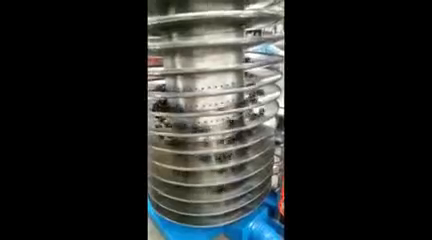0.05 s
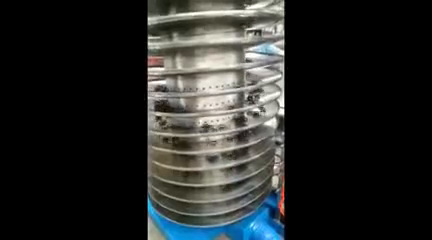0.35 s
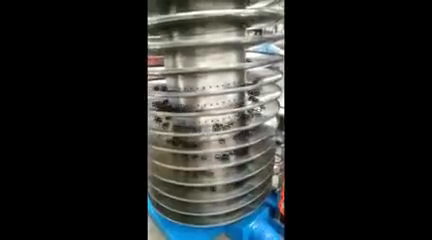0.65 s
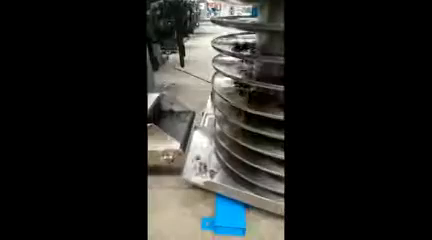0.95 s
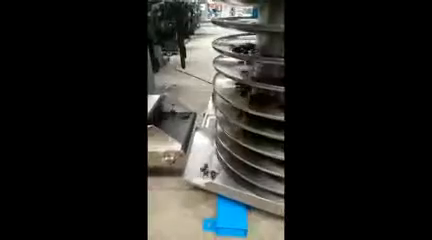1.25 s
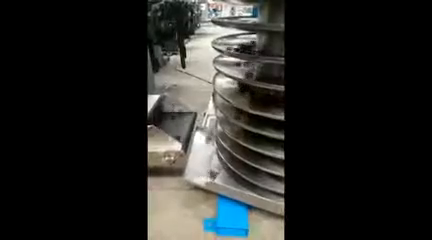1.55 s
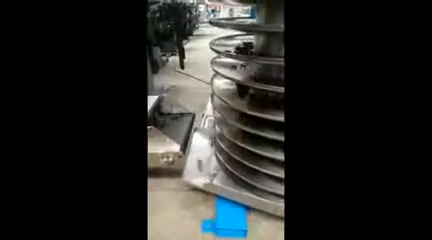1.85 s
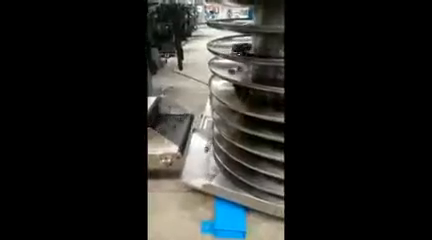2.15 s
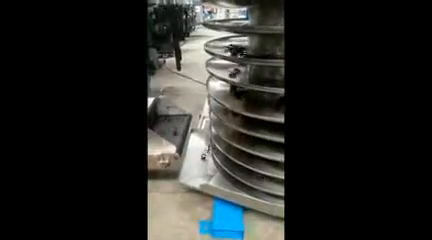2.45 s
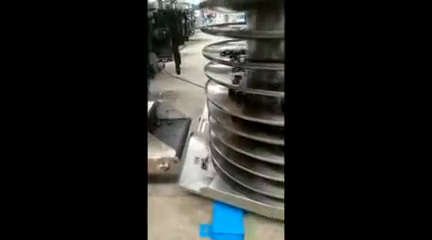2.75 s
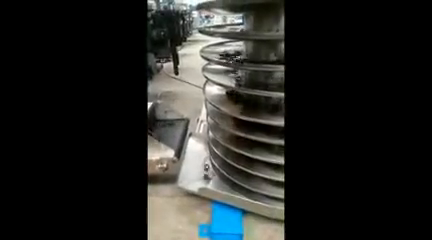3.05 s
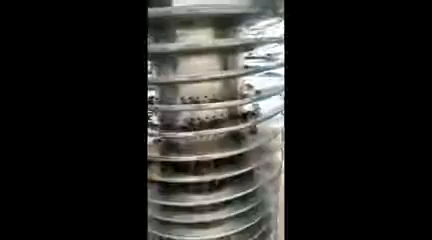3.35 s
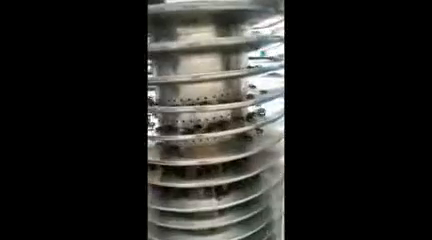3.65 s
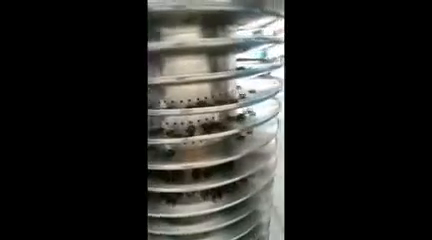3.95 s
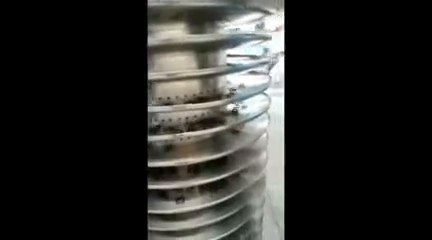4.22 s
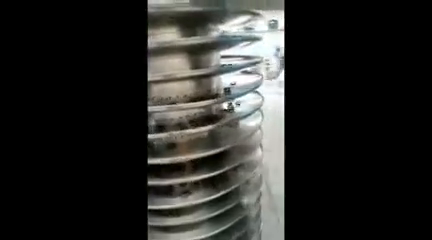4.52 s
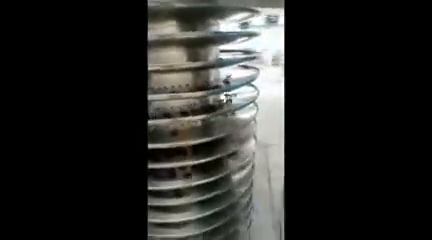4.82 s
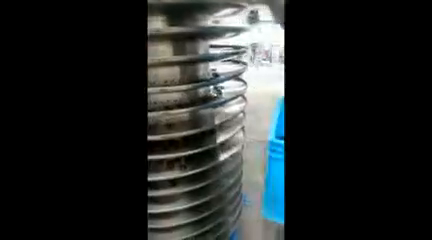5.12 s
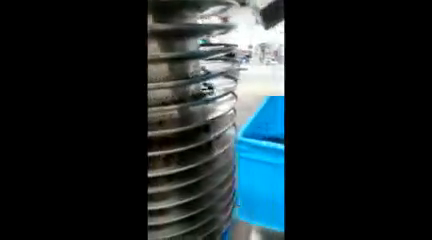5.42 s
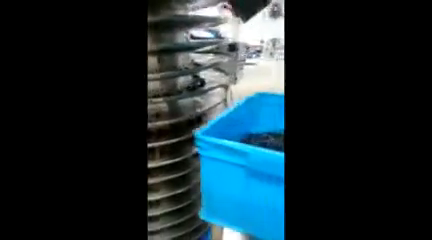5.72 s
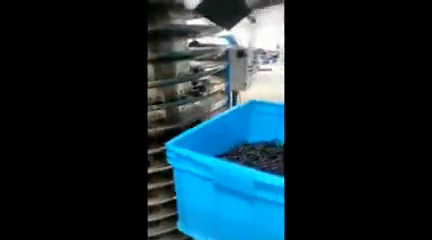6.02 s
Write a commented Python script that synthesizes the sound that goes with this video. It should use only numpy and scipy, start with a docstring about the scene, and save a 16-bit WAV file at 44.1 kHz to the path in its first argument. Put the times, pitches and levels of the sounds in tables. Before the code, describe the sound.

Close to a vibrating conveyor in a workshop, bright metallic clashes and chinks repeat in a fast, strict rhythm while small rubber parts patter on ringing steel. The noise breaks off briefly after one second, then resumes with a heavier pulsing hum and knocking from the base. About halfway through, the balance changes as if heard from another side, and a thin metallic ring grows toward the end.

```python
"""Vibrating spiral conveyor

A steel spiral shakes small rubber parts up its track in a workshop, heard close by from three
positions, with a short silence after the first. Random impacts make the sheet metal boom and ring,
and the parts patter over the hum of the drive. Five or six times a second, strictly in step,
the shaking swells: a loose steel edge clashes, then the base knocks and rebounds."""
import sys
import numpy as np
from scipy import signal
from scipy.fft import rfft, irfft
from scipy.io import wavfile
from scipy.ndimage import uniform_filter1d

SR = 44100
rng = np.random.default_rng(int(sys.argv[2]) if len(sys.argv) > 2 else 0)


def transcribe(u):
    """Save the signal u as a 16-bit wav file named by the first command-line argument.

    u: samples, shape (n,) or (channels, n), limited to [-1, 1]; the rate is SR.
    q: integer samples, one column per channel.
    """
    v = np.clip(np.atleast_2d(u).T, -1, 1)
    q = np.round(v * 32767).astype(np.int16)
    wavfile.write(sys.argv[1], SR, q)


N = 272538
TIME = np.arange(N) / SR
CYCLE_S = .1832  # period of the shaking

# Listening positions. Each row: start, end, time of one clash, time of one hum swell, all in seconds.
POSITIONS = [(0, .986, .165, .22), (1.689, 3.4, 1.7487, 1.808), (3.4, 6.2, 3.5177, 3.606)]
# Transmission to each position. Each row: gains in dB of boom, patter, clash, knock, chink, hum,
# the hum's octave and shudder.
PATH_GAINS = [(-18.5, -16, -1, -27, -16, -53.5, -32.5, -29.5),
              (-15.3, -19.3, -.3, -18.3, -16, -39.3, -40, -32),
              (-15, -19.8, .7, -20, -16.5, -36.5, -48, -31.3)]


def gain_of(db):
    """Decibels express an amplitude ratio on a logarithmic scale."""
    return 10 ** (np.asarray(db) / 20)


def unit_rms(x):
    """Normalisation to a mean power of 1."""
    return x / np.sqrt(np.mean(x ** 2) + 1e-20)


def add(mix, s, sound):
    """Superposition: a sound joins the mix at s seconds."""
    start = round(s * SR)
    sound = sound[max(-start, 0):]
    part = mix[max(start, 0):][:len(sound)]
    part += sound[:len(part)]


def colour(x, spectrum, size=4096):
    """A body filters x: convolution with a minimum-phase impulse response of unit energy."""
    hz, db = np.transpose(spectrum)
    log_hz = np.log(abs(np.fft.fftfreq(size, 1 / SR)) + 1)
    log_gain = np.log(gain_of(np.interp(log_hz, np.log(hz), db)))
    response = np.exp(np.conj(signal.hilbert(log_gain)))
    body = np.fft.ifft(response).real[:size // 2]
    return signal.oaconvolve(x, body / np.linalg.norm(body))[:len(x)]


def drift(rate_hz):
    """Low-passed noise gives a slow random fluctuation of rms 1."""
    hz = np.fft.rfftfreq(N, 1 / SR)
    return unit_rms(irfft(rfft(rng.standard_normal(N)) * np.exp(-(hz / rate_hz) ** 2), N))


def swell(s, half_s):
    """A Gaussian envelope: 1 at time s, 1/e at half_s to either side."""
    return np.exp(-((TIME - s) / half_s) ** 2)


def impacts(per_s, spread_db, size=N):
    """Shot noise: tiny blows of uneven strength at random moments; rms 1."""
    strength = gain_of(spread_db * np.clip(rng.standard_normal(size), -2, 2))
    polarity = rng.choice([-1, 1], size)
    return unit_rms(strength * polarity * (rng.random(size) < per_s / SR))


def chatter(rise_s, hold_s, t60_s, per_s, size=6000):
    """Steel rattles on steel: dense contacts build up, hold and decay exponentially."""
    t = np.arange(size) / SR
    decay = gain_of(-60 * np.maximum(t - hold_s, 0) / t60_s)
    return impacts(per_s, spread_db=.99, size=size) * np.minimum(t / rise_s, 1) * decay


def ring(blows, hz, width_hz):
    """Resonance: one mode of the steel responds to the blows in a narrow band; rms 1."""
    return unit_rms(signal.lfilter(*signal.iirpeak(hz, hz / width_hz, SR), blows))


def shaking_gain():
    """Forced vibration: sheet and parts both follow the strength of the shaking."""
    # Strength of the shaking. Each row: time in seconds, level in dB.
    strength = [(0, -1.4), (.9, -1.2), (1.95, 0), (2.3, -2), (2.85, -1.96), (3.25, -0.5), (4.35, 0.05),
                (5.2, -0.56), (6.2, -0.4)]
    return gain_of(np.interp(TIME, *np.transpose(strength)))


def sheet_metal():
    """Impact excitation: the wide steel flights boom and their modes ring; one signal a position."""
    # Broad response of the sheet. Each row: frequency in Hz, level in dB.
    boom_spectrum = [(20, -44.5), (55, -41), (90, -12), (150, -11.5), (220, -5.5), (350, -2), (490, -2.5),
                     (640, -1.5), (800, -2.5), (930, -3.5), (1100, -8), (1600, -16.5), (3000, -22),
                     (8000, -65.5)]
    # Modes of the spiral. Each row: frequency and bandwidth in Hz, level in dB at each position.
    modes = [(245, 10, -50, -33.5, -41), (306.3, 14, -47, -32.5, -39), (352.5, 19, -37.5, -39.5, -33),
             (424, 21, -38, -55, -29.5), (476, 12, -38.5, -54, -49), (530, 21, -49, -30.5, -48),
             (613.5, 7.9, -42, -33, -34), (624, 8, -41, -30, -29.5), (637.4, 6.4, -43.5, -47, -34.5),
             (720, 9, -38, -30.5, -31.5), (825, 9.9, -43.5, -36.5, -36), (907.5, 13, -35, -31, -35),
             (940, 17, -42, -29.5, -35), (1248, 14, -49.5, -39, -48), (1360, 27.5, -39, -42, -35.5),
             (1442, 17, -46, -39, -40), (1756, 9, -42.5, -36, -46), (1868, 17, -45.5, -33.5, -38),
             (1973, 30, -49, -47, -42), (2201, 8.4, -39.5, -32, -38), (2484, 13, -38, -46, -39.5),
             (4150, 42, -44, -55, -48), (4257, 24, -37, -51, -46), (4410, 24, -41, -44, -50),
             (4400, 26, -44.5, -44, -46), (4630, 76, -46, -60, -60)]
    blows = impacts(per_s=4000, spread_db=2.1)
    boom = colour(impacts(per_s=4000, spread_db=2.74), boom_spectrum)
    rings = np.array([ring(blows, hz, width) for hz, width, *_ in modes])
    ringing = gain_of(np.array(modes)[:, 2:].T) @ rings
    boom_gains = gain_of(np.array(PATH_GAINS)[:, :1])
    return shaking_gain() * (boom_gains * boom + ringing)


def rubber_parts():
    """Modulated shot noise: hundreds of small parts hop on the track and land in loose clumps."""
    # Patter from the front (first position) and the side. Each row: frequency in Hz, level in dB.
    front_spectrum = [(150, -32), (700, -10), (1300, -2), (1600, -2.5), (2400, 0.5), (3000, -2), (3700, -1),
                      (4300, 3.5), (4600, -2), (5000, -7.5), (6000, -16), (8500, -24), (10500, -28),
                      (14500, -63)]
    side_spectrum = [(150, -36), (700, -18.5), (1400, -2), (1700, -3.5), (2350, -2), (3000, -2.5),
                     (3700, -0.5), (4350, 3), (4600, -1), (5000, -6.5), (6000, -14.5), (8500, -29),
                     (10500, -36), (14500, -80)]
    hops = impacts(per_s=8000, spread_db=1.5) * gain_of(.48 * drift(70))
    front = gain_of(3) * colour(hops, front_spectrum)
    side = gain_of(1.8) * colour(hops, side_spectrum)
    return shaking_gain() * np.where(TIME < POSITIONS[1][0], front, side)


def drive(hum_db, octave_db, swell_s):
    """Harmonic vibration: the drive's fundamental swells once a cycle under a less steady octave."""
    # The swells that boom hardest. Each row: time in seconds, extra level in dB.
    hard_swells = [(1.808, 7), (2.724, 5), (3.975, 9), (4.705, 4), (5.072, 6), (5.438, 4)]
    hum_hz, swell_db, half_s = 96.3, 5, .017
    turns = hum_hz * TIME + .09 * drift(10)
    octave_turns = 2 * turns + .12 * drift(25)
    from_swell_s = (TIME - swell_s + CYCLE_S / 2) % CYCLE_S - CYCLE_S / 2
    surge_db = swell_db * np.exp(-(from_swell_s / half_s) ** 2)
    surge_db += sum(db * swell(s, 2 * half_s) for s, db in hard_swells)
    hum = gain_of(hum_db + surge_db) * np.sin(2 * np.pi * turns)
    octave = gain_of(octave_db + 2.5 * drift(8)) * np.sin(2 * np.pi * octave_turns)
    return np.sqrt(2) * (hum + octave)


def waver(hz, wobble_turns, flutter_db, rate_hz):
    """Random phase and amplitude modulation make a sustained ring waver."""
    turns = hz * TIME + wobble_turns * drift(rate_hz)
    return np.sqrt(2) * np.sin(2 * np.pi * turns) * gain_of(flutter_db * drift(rate_hz))


def singing_spiral():
    """Directional radiation: two modes of the spiral are loud only from certain places."""
    # The high mode, sung by one flight. Each row: time in seconds, level in dB.
    high_levels = [(0, -41), (3.4, -42), (3.6, -37), (3.8, -43), (4.0, -33), (4.15, -44), (4.6, -36),
                   (5.3, -34.5), (5.7, -29.7), (5.95, -33), (6.15, -28)]
    # Brief rises of the low mode. Each row: time and half width in seconds, level in dB.
    low_swells = [(3.48, .06, -23), (5.9, .11, -19.5)]
    high = waver(hz=2447, wobble_turns=.09, flutter_db=2.2, rate_hz=25)
    low = waver(hz=744, wobble_turns=.14, flutter_db=2, rate_hz=35)
    high_gain = gain_of(np.interp(TIME, *np.transpose(high_levels)))
    low_gain = sum(gain_of(db) * swell(s, half_s) for s, half_s, db in low_swells)
    return high_gain * high + low_gain * low


def workshop():
    """Ambient noise: a steady broadband background, weak in the treble."""
    # Background of the room. Each row: frequency in Hz, relative level in dB.
    spectrum = [(20, -13), (60, 2), (300, 9.5), (1000, 8.5), (4000, -16.5), (14000, -49.5)]
    return gain_of(-32) * colour(rng.standard_normal(N), spectrum)


def loose_edge(times, place):
    """Intermittent contact: a loose edge clashes and rings each cycle; its hardest contact ticks."""
    # Spectra of the clash and the tick. Each row: frequency in Hz, level in dB.
    clash_spectrum = [(500, -22), (1800, -2.5), (2300, -4), (3200, -0.5), (4400, 9), (5200, 4), (6400, 3.5),
                      (7300, -1.5), (8200, -27.5), (11000, -12.5), (14500, -55.5)]
    tick_spectrum = [(3000, -18), (8000, -1), (11000, 0), (14500, 2)]
    # Modes of the edge. Each row: frequency and bandwidth in Hz, level in dB at each position.
    modes = [(2228, 45, -41, -44, -37.5), (4430, 90, -36, -34.5, -37), (5200, 140, -48, -46, -42),
             (5934, 20, -49, -45, -48), (6550, 350, -48, -41.5, -46)]
    # Clashes that stand out. Each row: time in seconds, extra clash and tick levels in dB.
    hard_clashes = [(1.934, 1.5, 2), (2.117, 1.2, 0), (2.667, .7, 0), (3.033, 1.7, 3), (3.216, 4, 3),
                    (3.52, 1.5, 6), (3.886, .7, 2), (4.069, .5, 7), (4.619, 0, 14), (4.985, .7, 15.5),
                    (5.168, 0, 9), (5.352, .7, 15)]
    hard = np.array(hard_clashes)
    clashes, ticks = np.zeros((2, N))
    shape = dict(rise_s=.008, hold_s=.015, t60_s=.095)
    recurring = chatter(**shape, per_s=22000)  # the share that is alike in every cycle
    for s in times:
        extra_db, extra_tick_db = hard[abs(hard[:, 0] - s) < CYCLE_S / 2, 1:].sum(axis=0)
        past_s = max(s - 4.3, 0)  # clashes fade and dull as the listener moves past the edge
        clash_db = -15.5 + extra_db - 1.8 * past_s + .5 * rng.uniform(-1, 1)
        tick_db = -46 + extra_tick_db - 8 * past_s + 2.5 * rng.uniform(-1, 1)
        clash = (recurring + 1.9 * chatter(**shape, per_s=20000)) / 2
        tick = chatter(rise_s=.003, hold_s=.013, t60_s=.1, per_s=6400)
        add(clashes, s, gain_of(clash_db) * clash)
        add(ticks, s + .0035, gain_of(tick_db) * tick)
    ringing = sum(gain_of(db[place]) * ring(clashes, hz, width) for hz, width, *db in modes)
    return gain_of(-4.5) * colour(clashes, clash_spectrum) + ringing + colour(ticks, tick_spectrum)


def frame_shudder(times, one_cycle):
    """Periodic forcing: the frame shudders alike in every cycle."""
    # Response of the frame. Each row: frequency in Hz, level in dB.
    spectrum = [(20, -22), (40, -24.5), (50, -15.5), (65, -14), (85, 7), (120, 7), (180, 6), (260, -1),
                (350, 5.5), (600, -1), (1500, -46.5), (6000, -65.5)]
    force = np.zeros(N)
    for s in [times[0] - CYCLE_S, *times]:
        add(force, s, one_cycle)
    return colour(force, spectrum)


def jangle():
    """Damped free vibration: close modes of the base, in a different mixture at each contact."""
    # Modes of the base. Each row: frequency in Hz, time to decay 60 dB in seconds, level in dB.
    modes = [(3960, .022, -4), (4100, .022, .5), (4450, .024, -1.5), (4630, .016, 4)]
    t = np.arange(3000) / SR
    rise = np.sin(np.pi / 2 * np.minimum(t / .0015, 1)) ** 2
    ringing = np.zeros_like(t)
    for hz, t60_s, db in modes:
        share, phase = rng.random(2)
        ringing += (.5 + share) * gain_of(db - 60 * t / t60_s) * np.sin(2 * np.pi * (hz * t + phase))
    return rise * ringing


def knocking_base(times, knock_db, chink_db):
    """Inelastic collision: the base knocks, chinks and rebounds twice, jangling at each contact."""
    # Spectra of the dull knock and the bright chink. Each row: frequency in Hz, level in dB.
    knock_spectrum = [(40, -36), (90, -12), (150, 0), (230, 4.5), (295, 7), (400, -8), (600, -27),
                      (2000, -43.5)]
    chink_spectrum = [(1500, -15), (3500, -1), (4600, 14), (5500, 6.5), (7000, 2), (8400, -3.5),
                      (10000, -20), (14500, -61)]
    # The knocks that thump hardest. Each row: time in seconds, extra level in dB.
    hard_knocks = [(1.798, 3), (2.164, 3.5), (2.347, 2.5), (2.53, 1), (2.714, 3), (2.897, 3.5), (3.08, 1),
                   (3.263, 2), (3.934, 2), (4.117, 2), (4.3, 1.5), (4.666, 4.5), (5.399, 5), (6.132, 2)]
    hard = np.array(hard_knocks)
    rebound_s, restitution, jangle_lag_s = .0142, .52, .0022
    knocks, chinks, jangles = np.zeros((3, N))
    force_pulse = np.hanning(40)
    for s in times:
        extra_db = hard[abs(hard[:, 0] - s) < CYCLE_S / 2, 1].sum()
        strength = gain_of(1.2 * rng.uniform(-1, 1))
        for k in range(3):
            contact_s = s + k * rebound_s
            bounce = strength * restitution ** k
            add(knocks, contact_s, gain_of(extra_db) * bounce * force_pulse)
            add(jangles, contact_s + jangle_lag_s, bounce * jangle())
        add(chinks, s, strength * chatter(rise_s=.005, hold_s=.012, t60_s=.13, per_s=7000))
    bright = gain_of(-8.5) * colour(chinks, chink_spectrum) + jangles
    return gain_of(knock_db) * colour(knocks, knock_spectrum) + gain_of(chink_db) * bright


def scene():
    """Superposition: machine and workshop add up in a different balance at each position in turn."""
    knock_lag_s, landing_lag_s = .0482, .036  # after each clash
    background = singing_spiral() + workshop()
    steel, patter = sheet_metal(), rubber_parts()
    # one cycle of the shudder holds every harmonic of the cycle rate, at random phase
    phases = rng.random(round(CYCLE_S * SR / 2) + 1)
    shudder_cycle = unit_rms(irfft(np.exp(2j * np.pi * phases)))
    out = np.zeros(N)
    for place, (start, end, clash_s, swell_s) in enumerate(POSITIONS):
        _, patter_db, clash_db, knock_db, chink_db, hum_db, octave_db, shudder_db = PATH_GAINS[place]
        clash_times = np.arange(clash_s % CYCLE_S - CYCLE_S, TIME[-1], CYCLE_S)
        knock_times = clash_times + knock_lag_s
        landing_db = .28 * np.cos(2 * np.pi * (TIME - clash_s - landing_lag_s) / CYCLE_S)
        track = steel[place] + gain_of(patter_db + landing_db) * patter
        edge = gain_of(clash_db) * loose_edge(clash_times, place)
        frame = gain_of(shudder_db) * frame_shudder(knock_times, shudder_cycle)
        base = knocking_base(knock_times, knock_db, chink_db)
        hum = drive(hum_db, octave_db, swell_s)
        heard = uniform_filter1d(1. * ((TIME >= start) & (TIME < end)), size=40)
        out += heard * (background + track + edge + frame + base + hum)
    return out[None]


def record(dry):
    """Soft saturation rounds the loudest peaks; a low-pass filter limits the band."""
    knee, headroom, cutoff_hz = .78, .2, 14800
    over = np.maximum(abs(dry) - knee, 0)
    rounded = dry + np.sign(dry) * (headroom * np.tanh(over / headroom) - over)
    lowpass = signal.firwin(511, cutoff_hz, window=("kaiser", 9), fs=SR)
    return signal.oaconvolve(rounded, lowpass[None], "same")


dry = scene()
out = record(dry)
transcribe(out)
```